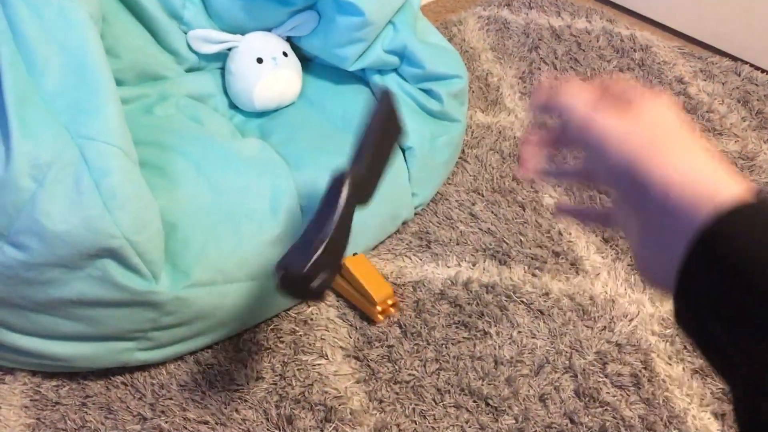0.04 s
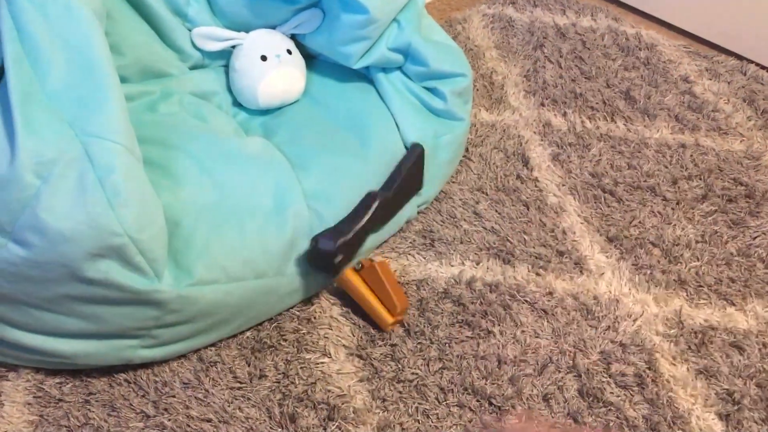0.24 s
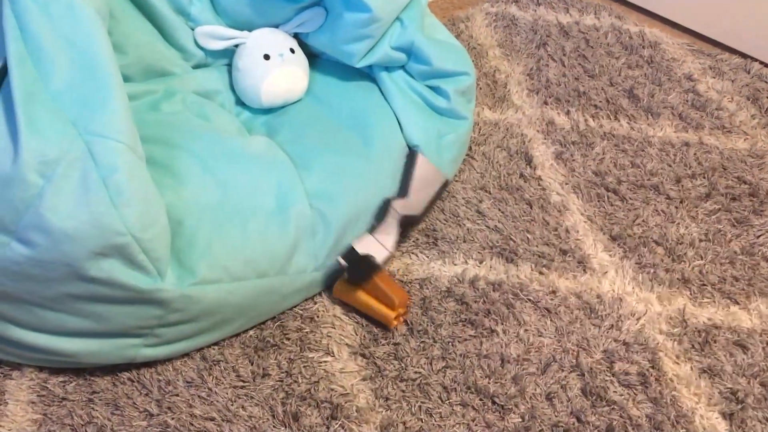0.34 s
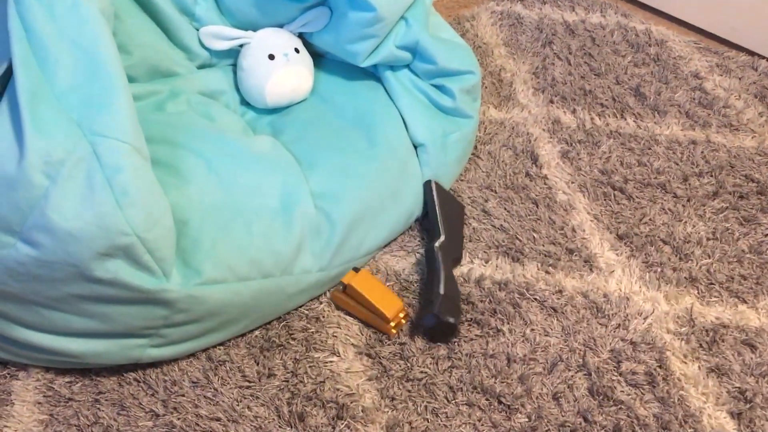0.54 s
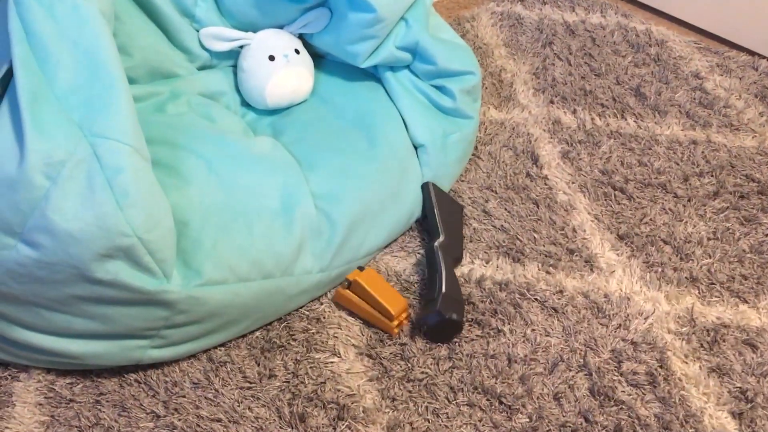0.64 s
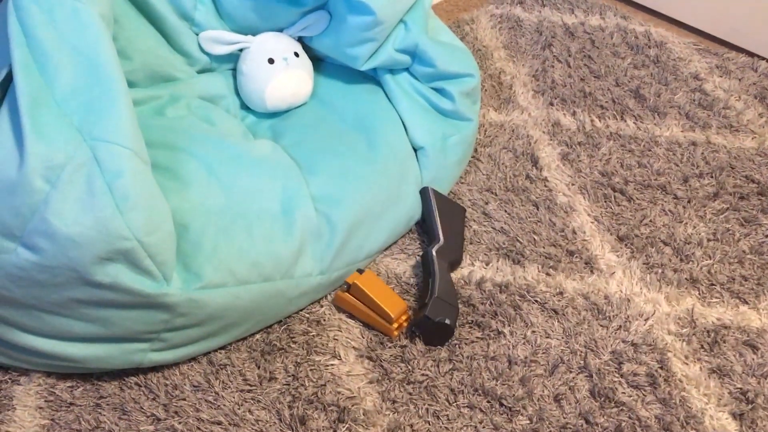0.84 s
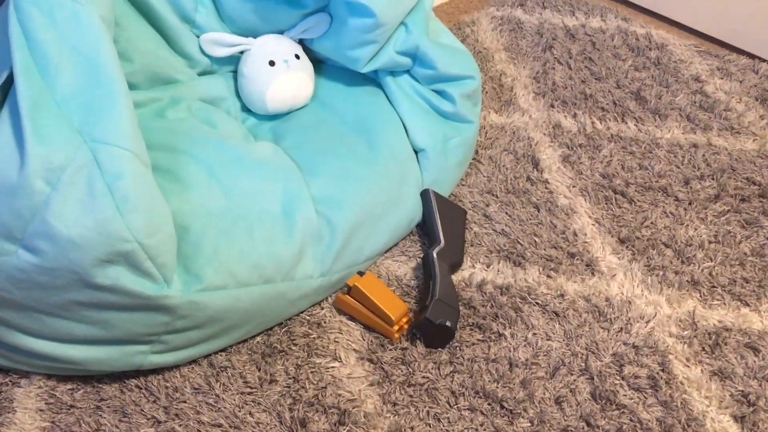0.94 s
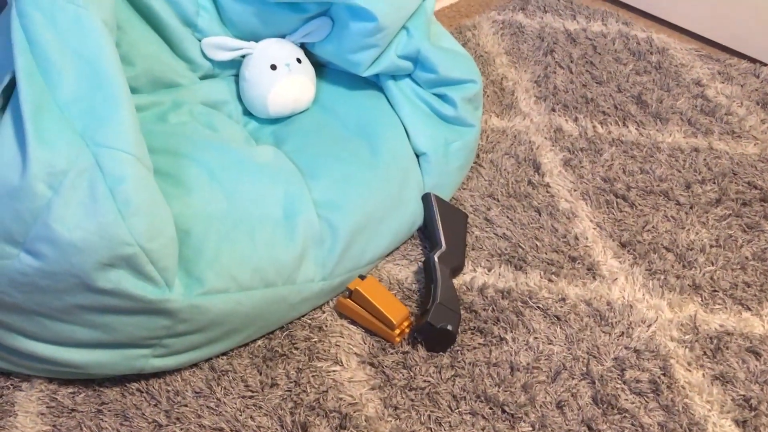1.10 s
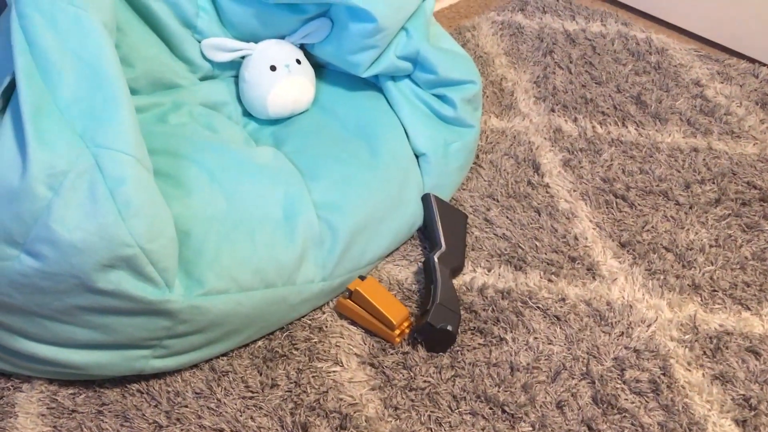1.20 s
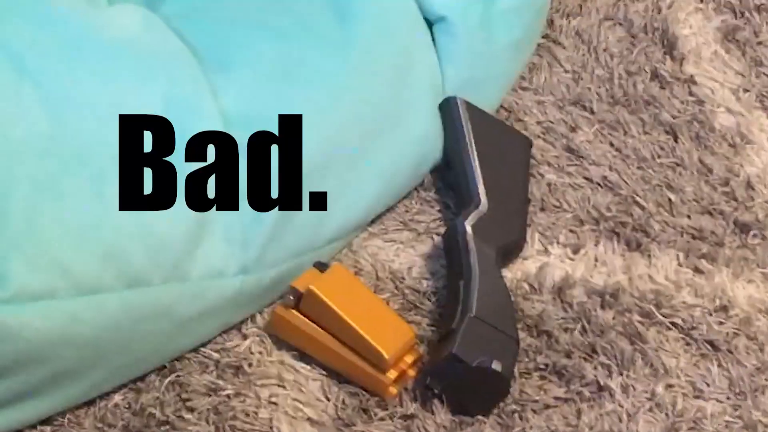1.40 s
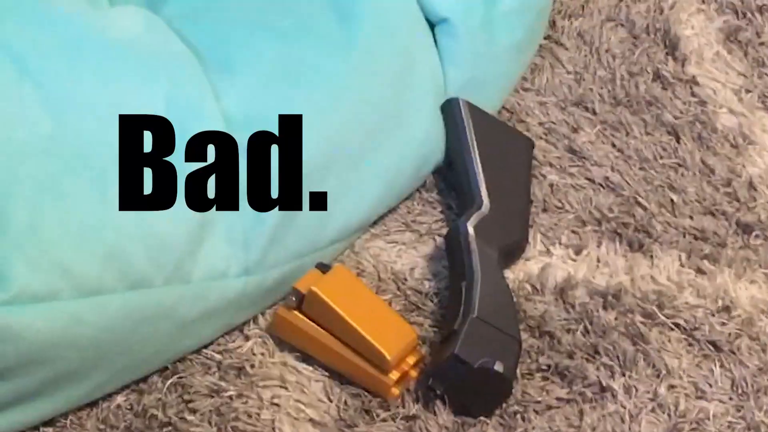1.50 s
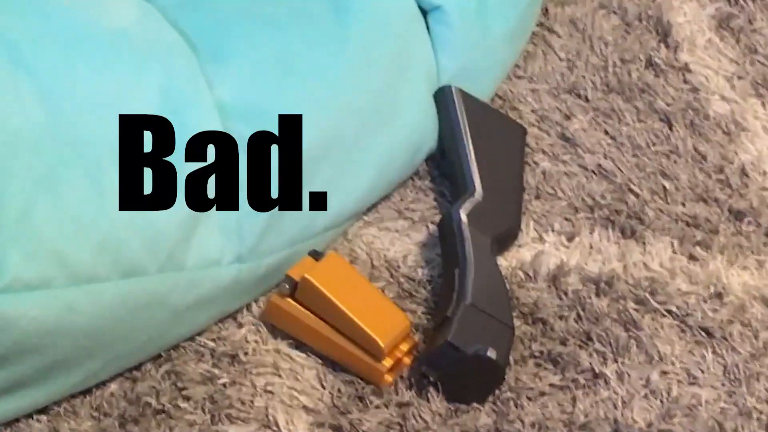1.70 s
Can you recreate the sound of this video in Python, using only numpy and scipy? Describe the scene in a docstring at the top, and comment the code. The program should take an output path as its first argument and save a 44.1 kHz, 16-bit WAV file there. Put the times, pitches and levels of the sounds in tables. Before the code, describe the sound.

A hard plastic object lands with a sharp clack, then clatters briefly and settles.

```python
"""A long hollow plastic object is tossed onto a small plastic piece on a shaggy carpet in a quiet room.
It hits with a sharp double clack, bounces, knocks again, rattles and slides to rest against a beanbag.
Each impact excites normal modes: heavily damped ones crack, lightly damped ones ring, and the weight
makes the floor thud. Friction on cloth and pile adds soft swishes, and the room a short reverberation.
Later comes a soft low bump; faint room noise with a thin steady whine lies under it all."""
import sys
import numpy as np
from scipy import signal
from scipy.fft import rfft, irfft
from scipy.io import wavfile

SR = 44100
rng = np.random.default_rng(int(sys.argv[2]) if len(sys.argv) > 2 else 0)


def master(y):
    """Save y as 16-bit WAV."""
    cut = np.clip(np.atleast_2d(y).T, -1, 1)
    pcm = np.round(cut * 32767)  # scale
    wavfile.write(sys.argv[1], SR, pcm.astype(np.int16))


N = 77175
TIME = np.arange(N) / SR

# Centres in Hz of the crack's bass, middle, presence and treble bands.
CRACK_CENTRES_HZ = [350, 1300, 3800, 11000]
# Colour within those bands. Each row: frequency in Hz, relative spectral density in dB.
CRACK_SPECTRUM = [(80, -13), (160, 5), (310, 4), (420, -1.5), (560, -1.5), (750, -4), (1050, 1.5),
                  (1700, -2.5), (2600, 0), (3000, -4.5), (3600, 2), (4500, 0), (5000, -9.5), (5400, 2),
                  (6900, -7), (8000, -2.5), (11100, 1.5), (11900, -4), (13000, 0), (15000, 1)]
# Plastic striking plastic. Each row: start in seconds, crack level in dB in each of the four bands,
# ring level in dB, frequency in Hz above which the ring is duller, frequency in Hz that the contact
# point favours, gain there in dB (negative where it suppresses).
IMPACTS = [(0.2033, -14.5, -11, -13, -24.5, -37, 6400, 5350, 14),
           (0.2121, -14, -23.5, -10.5, -7.5, -22.5, 14900, 4100, -37.5),
           (0.4078, -44, -43, -39, -33.5, -45.5, 4510, 2747, 15.5),
           (0.4240, -42, -45, -49, -38.5, -79, 4000, 2650, -12),
           (0.4367, -36, -17.5, -29.5, -31.5, -37, 3040, 1305, 18),
           (0.4543, -58, -35.5, -49, -58, -50, 2520, 1320, 23),
           (0.4863, -49, -37, -45, -52, -53.5, 2800, 2180, 16),
           (0.509, -48, -56, -40, -54, -57, 4900, 2804, 33.5),
           (0.5187, -45, -39.5, -49, -43, -64, 4980, 2650, 11),
           (0.5270, -45.5, -60, -64, -47, -54, 5000, 3730, 0),
           (0.536, -53, -53, -42, -40, -54, 5000, 3500, 9.5),
           (0.542, -49, -36, -59.5, -46, -62, 3000, 1200, 7),
           (0.5474, -44, -57, -48, -50, -58.5, 3000, 1310, 14)]
def cracks():
    """Modal overlap: at each impact a crowd of heavily damped modes merges into a brief noise burst."""
    envelope = decay(t60=0.021) * onset(rise_s=0.00042)
    envelope_rms = np.sqrt(np.mean(envelope ** 2))
    out = np.zeros(N)
    for start, *band_db, _, _, _, _ in IMPACTS:
        bands = band_noises(CRACK_CENTRES_HZ, CRACK_SPECTRUM)
        burst = sum(from_db(db) * unit_rms(band * envelope) for db, band in zip(band_db, bands))
        out += delayed(envelope_rms * burst, start)
    return out


# Ringing modes of the long plastic object and the small piece it strikes, then of the thin walls.
# Each row: frequency in Hz, relative level in dB, time to decay by 60 dB (T60) in seconds.
PLASTIC_MODES = [(559.5, -10.5, 0.15), (981, 0.5, .11), (1065, -1.5, .11), (1319, -1.5, 0.07),
                 (1516, -8, .2), (1996, -2.5, 0.072), (2245, -2, .12), (2633, -2, .16), (3310, -8.5, .09),
                 (3524, -0.5, .07), (3925, -3.5, 0.16), (4305, -5, .12), (5380, -1.5, 0.028),
                 (5500, -6, 0.044), (5730, -8, 0.2)]
WALL_MODES = [(7840, -7.5, 0.05), (8200, -6.5, 0.023), (9200, -3, 0.11), (9890, -2, .05), (11220, 0, 0.054),
              (13200, -6, .04), (14700, -4, .035)]
def plastic_ringing():
    """Modal excitation: soft impacts miss the high modes, and the contact point weights the others."""
    modes = PLASTIC_MODES + WALL_MODES
    hz, tones = np.array(modes)[:, 0], damped_sines(modes)
    focus_octaves = 0.11
    out = np.zeros(N)
    for start, *_, ring_db, dull_hz, focus_hz, focus_db in IMPACTS:
        position_db = focus_db * np.exp(-(np.log2(hz / focus_hz) / focus_octaves) ** 2)
        scatter_db = rng.standard_normal(len(hz))
        rolloff = 1 / np.sqrt(1 + (hz / dull_hz) ** 6)
        amplitudes = from_db(ring_db + position_db + scatter_db) * rolloff
        out += delayed(amplitudes @ tones, start)
    return out


# Modes of the floor, then of the long body in bending.
# Each row: frequency in Hz, relative level in dB, T60 in seconds.
BOOM_MODES = [(62, -12, .22), (132, -3, .11), (165, 0, .135), (190, -6, .17), (304, -3, .075)]
BENDING_MODES = [(482, 0.5, 0.16)]
# The weight coming down. Each row: start in seconds, floor gain in dB, bending gain in dB.
LANDINGS = [(0.2051, -31, -62), (0.215, -19, -66), (0.409, -59, -42.5), (0.4370, -55, -37),
            (0.5090, -60, -44.5), (0.623, -60.5, -67.5)]
def thuds():
    """Impulse response: each landing makes the floor boom and the long body bend with a hollow note."""
    bass_cut = signal.butter(2, 130, "high", fs=SR, output="sos")
    boom = signal.sosfilt(bass_cut, ring(BOOM_MODES))
    bend = ring(BENDING_MODES)
    return sum(delayed(from_db(boom_db) * boom + from_db(bend_db) * bend, start)
               for start, boom_db, bend_db in LANDINGS)


# Colour of the rubbing. Each row: frequency in Hz, relative spectral density in dB.
FRICTION_SPECTRUM = [(300, -4), (1500, -2), (5000, -5), (9000, -1.5), (13000, 4), (16000, 1)]
# Sliding contacts. Each row: middle in seconds, half length in seconds, level at the middle in dB.
SLIDES = [(0.15, 0.15, -67), (0.381, 0.041, -61.5), (0.522, 0.022, -57.5), (0.621, .015, -63),
          (0.744, 0.023, -63.5)]
def swishes():
    """Friction noise: plastic brushing over cloth and carpet pile gives short soft swells of hiss."""
    envelope = sum(from_db(db) * np.exp(-((TIME - middle) / half) ** 2) for middle, half, db in SLIDES)
    return coloured_noise(FRICTION_SPECTRUM) * envelope


# Resonances of the late bump. Each row: frequency in Hz, relative level in dB, T60 in seconds.
LOW_BUMP_MODES = [(66, -2.5, 0.19), (130, 2, 0.039), (299.8, -2.5, 0.022), (625.5, -8, 0.032)]
def bump():
    """Free decay: a few low damped modes, excited once, sound as a soft bump."""
    return from_db(-45) * delayed(ring(LOW_BUMP_MODES), start_s=1.3595)


# The room's tail. Each row: band centre in Hz, relative level in dB, T60 in seconds.
REVERB_BANDS = [(80, -11.5, .25), (180, -3.5, 0.31), (400, -10, 0.22), (740, -4, 0.25), (1500, -8, 0.2),
                (2970, -6.5, .22), (5800, -4, .23), (9000, -5.5, .24), (14000, -7.5, 0.21)]
def reverberation(sound):
    """Diffuse field: dense reflections build up quickly, then die away at each band's own rate."""
    bands = band_noises([row[0] for row in REVERB_BANDS])
    response = np.zeros(N)
    for (_, db, t60), band in zip(REVERB_BANDS, bands):
        envelope = decay(t60) * onset(rise_s=0.0027)
        response += from_db(db) * np.std(band) * unit_rms(band * envelope) / np.sqrt(N)
    return signal.fftconvolve(sound, delayed(response, start_s=0.004))[:N]


# Room air with a low rumble. Each row: frequency in Hz, relative spectral density in dB.
AIR_SPECTRUM = [(25, -8.5), (59, -1), (88, -13), (144, -12), (221, -16), (350, -14), (430, -20), (850, -23),
                (1000, -17.5), (1340, -25.5), (1800, -22.5), (3000, -25.5), (4500, -32), (7000, -34),
                (9500, -33.5), (12500, -32.5), (15500, -33)]
# Low hum and a thin whine. Each row: frequency in Hz, rms level in dB.
STEADY_TONES = [(58, -74.5), (140, -75.5), (1268, -78.5)]
def background():
    """Stationary noise: the continuous spectrum of room air lies under the lines of hum and whine."""
    tones = sum(from_db(db) * np.sqrt(2) * np.sin(2 * np.pi * (hz * TIME + rng.random()))
                for hz, db in STEADY_TONES)
    return from_db(-65) * coloured_noise(AIR_SPECTRUM) + tones


def damped_sines(modes):
    """Damped oscillators: one decaying sine for each mode, signs alternating."""
    return np.array([(-1) ** k * from_db(db) * np.sin(2 * np.pi * hz * TIME) * decay(t60)
                     for k, (hz, db, t60) in enumerate(modes)])


def ring(modes):
    """Superposition: all the modes struck together."""
    return damped_sines(modes).sum(axis=0)


def decay(t60):
    """Exponential damping: a fall of 60 dB in t60 seconds."""
    return np.exp(-np.log(1000) * TIME / t60)


def onset(rise_s):
    """First-order rise from zero towards one."""
    return 1 - np.exp(-TIME / rise_s)


def delayed(sound, start_s):
    """Time shift: silence until the sound starts."""
    return np.concatenate([np.zeros(int(start_s * SR)), sound])[:N]


def coloured_noise(spectrum):
    """Spectral shaping: white noise takes on the given spectrum, at rms 1."""
    gain = spectral_gain(spectrum, np.fft.rfftfreq(N, 1 / SR))
    return unit_rms(irfft(rfft(rng.standard_normal(N)) * gain, N))


def band_noises(centres, spectrum=None):
    """Complementary filters: one noise above 50 Hz, white unless shaped, split into overlapping bands."""
    hz = np.maximum(np.fft.rfftfreq(N, 1 / SR), 1)
    bins = np.exp(2j * np.pi * rng.random(len(hz))) * np.sqrt(N) * (hz > 50)
    if spectrum:
        bins *= spectral_gain(spectrum, hz)
    windows = [np.interp(np.log(hz), np.log(centres), peak) for peak in np.eye(len(centres))]
    return [irfft(bins * window, N) for window in windows]


def spectral_gain(spectrum, hz):
    """Frequency response: gain between (Hz, dB) points on a log-frequency axis."""
    points_hz, points_db = np.transpose(spectrum)
    return from_db(np.interp(np.log(np.maximum(hz, 1)), np.log(points_hz), points_db))


def from_db(db):
    """Decibels to amplitude ratio."""
    return 10 ** (np.asarray(db) / 20)


def unit_rms(sound):
    """Normalisation to rms 1."""
    return sound / np.sqrt(np.mean(sound ** 2) + 1e-20)


def scene():
    """Superposition: the clatter, its reverberation, the late bump and the background add in mono."""
    contact, ringing, weight = cracks() + swishes(), plastic_ringing(), thuds()
    tail = reverberation(contact + from_db(-14) * ringing + from_db(-12) * weight)
    return (contact + ringing + weight + tail + bump() + background())[None]


def record(dry):
    """Saturation and band limiting: peaks are rounded, then the treble above 15.8 kHz is cut."""
    lowpass = signal.ellip(10, .2, 80, 15800, fs=SR, output="sos")
    return signal.sosfilt(lowpass, np.tanh(dry))


dry = scene()
out = record(dry)
master(out)
```